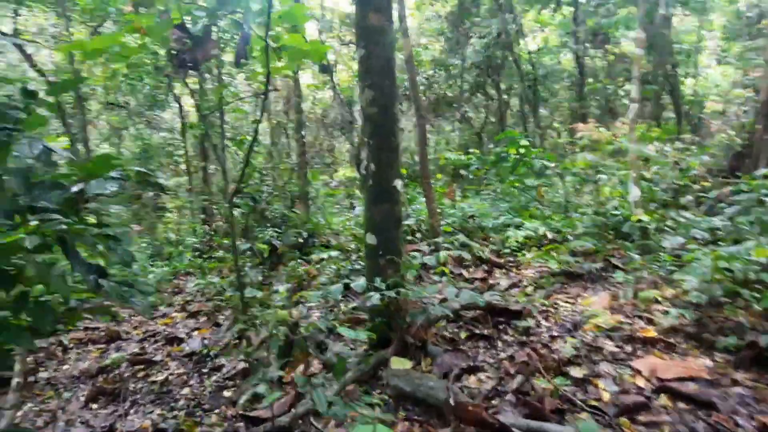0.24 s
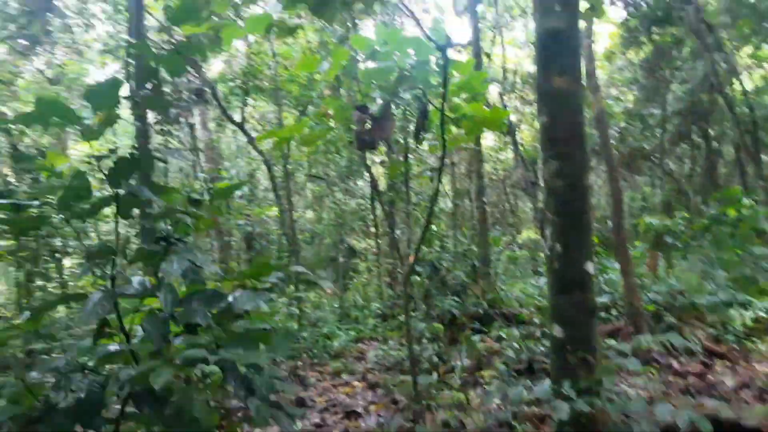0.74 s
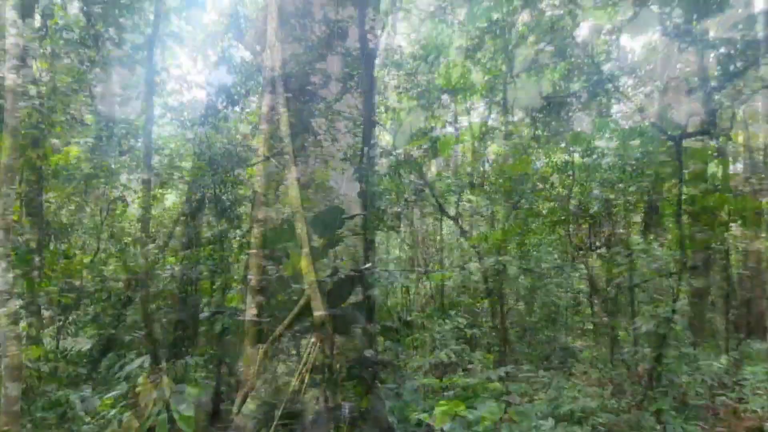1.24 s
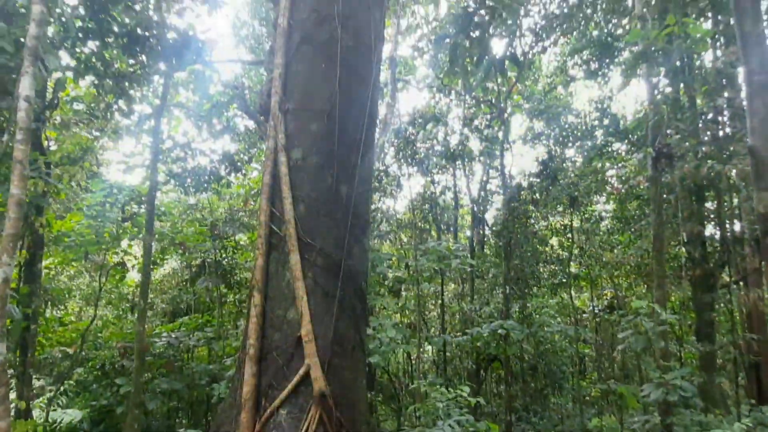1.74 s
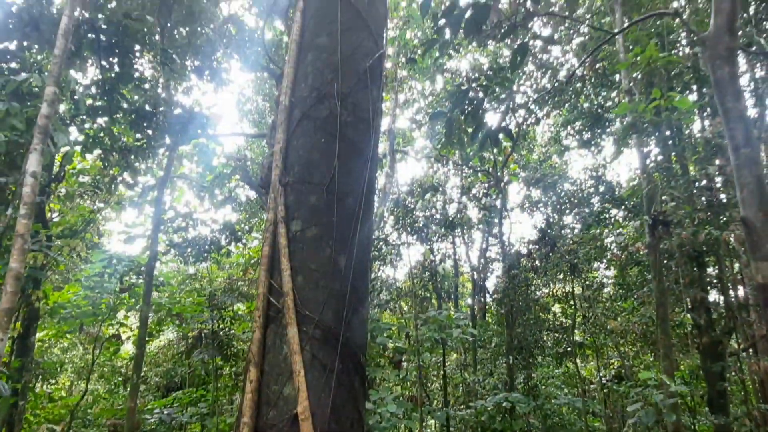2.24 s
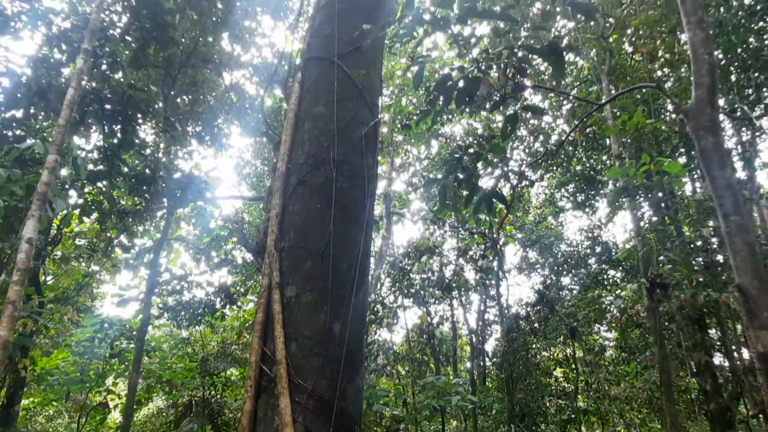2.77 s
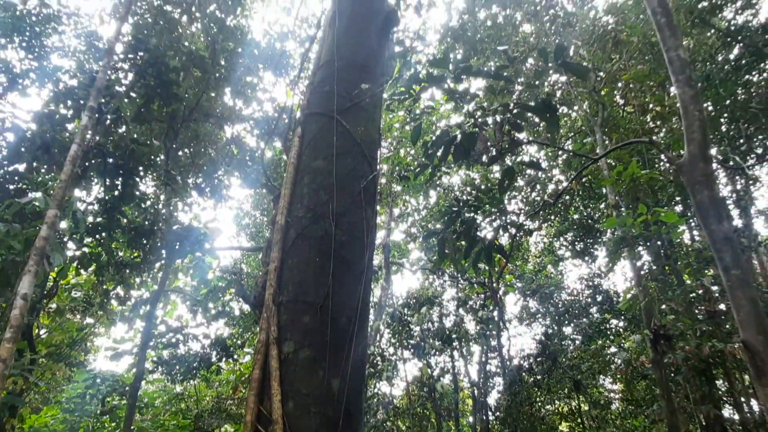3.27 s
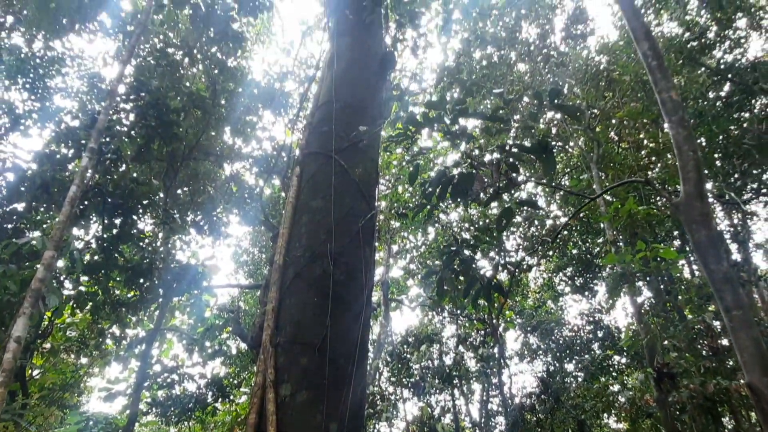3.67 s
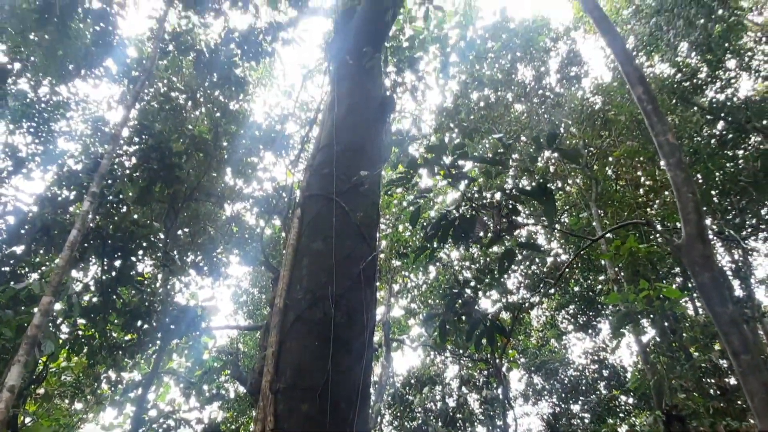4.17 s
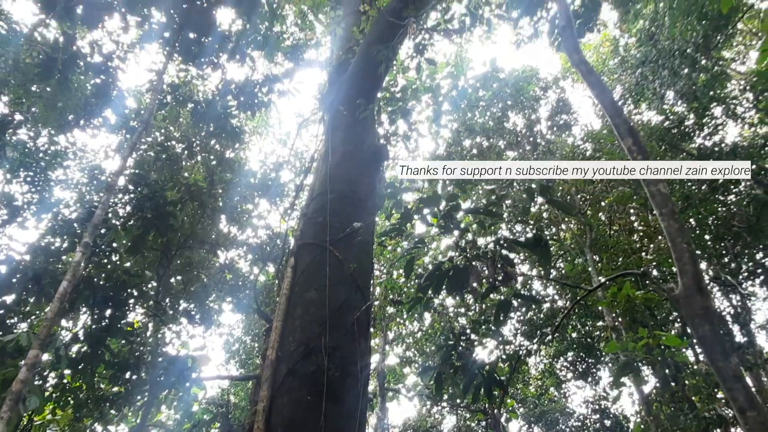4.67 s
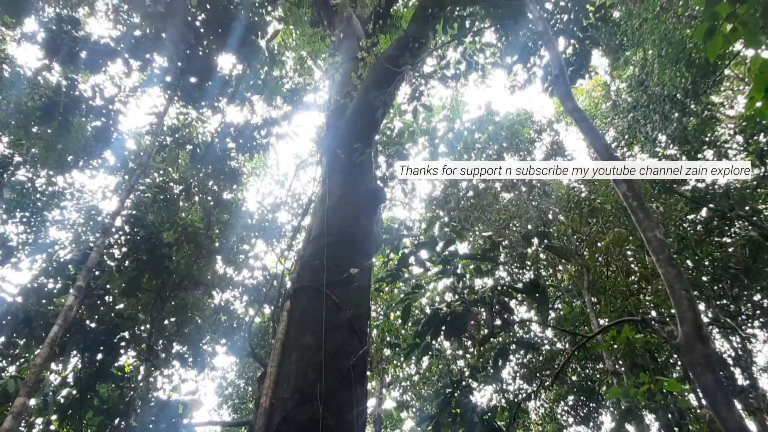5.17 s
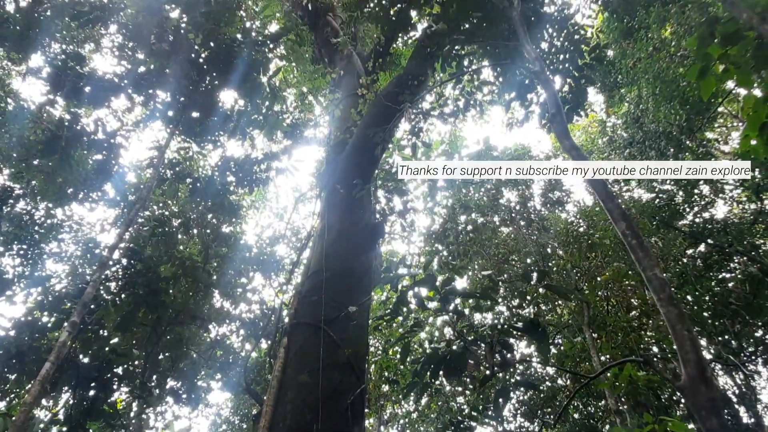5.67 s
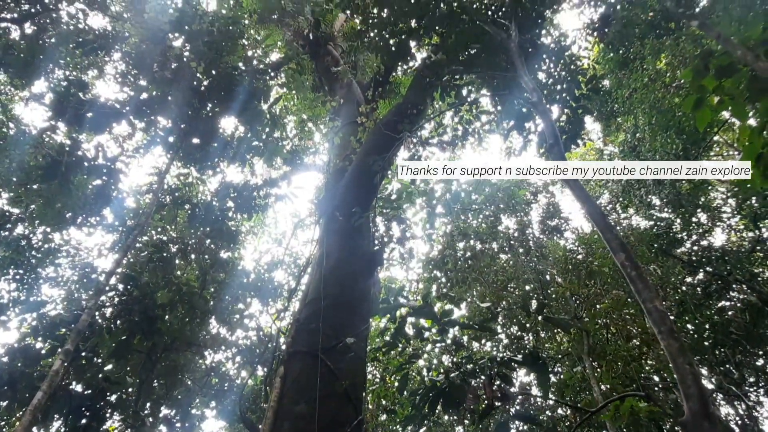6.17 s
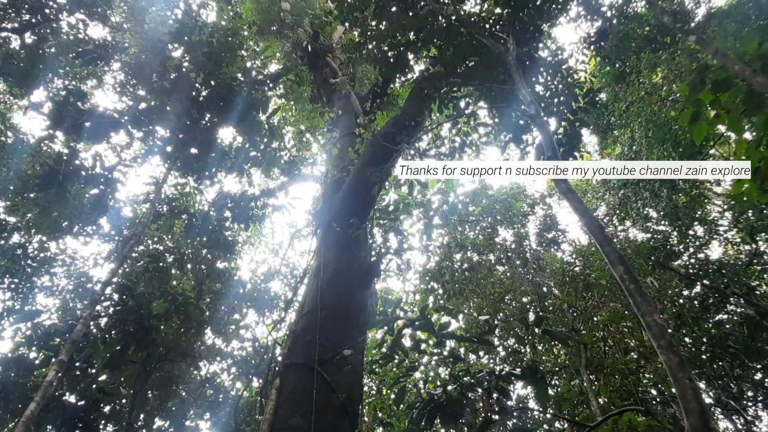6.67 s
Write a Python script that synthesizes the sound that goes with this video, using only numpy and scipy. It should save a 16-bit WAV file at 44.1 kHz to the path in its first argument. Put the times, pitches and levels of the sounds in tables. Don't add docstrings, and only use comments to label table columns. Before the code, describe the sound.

A dense insect chorus fills a tropical forest from 0 to about 6.9 seconds, heard in wide stereo on a handheld microphone. Cicadas hold a shrill, slightly wavering drone near 3 kHz over a blur of distant insect hiss; a fine rasping buzz near 5.8 kHz leans right, and very high katydid hiss near 11 kHz swells about every 0.7 seconds, at first mostly left. From 0 to 0.7 seconds a foot presses dry leaves with twig snaps, the heaviest crunch at 0.5; light crackles end near 1.1. At 0.95-1.2 a gust thumps the left side with low, lumpy thuds, a faint puff reaching the right. The insects duck, then recover by 2.5 as the microphone turns, katydids becoming more centred and the buzz stronger. Afterward the chorus continues with quiet low-air swells, faint leaf stirs and tiny ticks or drips.

```python
import sys
import numpy as np
from scipy import signal
from scipy.fft import rfft, irfft, next_fast_len
from scipy.io import wavfile

SR = 44100
rng = np.random.default_rng(int(sys.argv[2]) if len(sys.argv) > 2 else 0)


def dump_mix(stems):
    frames = np.atleast_2d(stems).T
    limited = np.clip(frames, -1, 1)
    pcm = np.round(limited * 32767).astype(np.int16)
    wavfile.write(sys.argv[1], SR, pcm)


def invert_db(level):
    return 10 ** (np.asarray(level, dtype=float) / 20)


N = 304731
TIME = np.arange(N) / SR
HZ = np.maximum(np.fft.rfftfreq(next_fast_len(N), 1 / SR), 1)

# (frequency [Hz], density [dB per Hz])
FAR_HISS_COLOUR = [(1000, -48), (1280, -28), (1400, -12), (1850, -7.5), (2050, -12), (2350, 1.5), (2700, 5),
                   (3400, 5.5), (4500, 1.5), (6500, 5.5), (7800, 0), (9500, -1), (14000, -5), (15100, -6.5)]
# (frequency [Hz], density [dB per Hz])
RUMBLE_COLOUR = [(15, -53), (25, -22.5), (49, -8), (119, 2), (189, -6), (310, -1.5), (355, 1), (432, -8),
                 (900, -21.5), (1170, -48), (1980, -120)]
# (frequency [Hz], density [dB per Hz])
STIR_COLOUR = [(450, -5), (800, -5), (1250, -1), (1900, -12)]
# (start of the top [s], hold [s], level [dB])
SWELLS = [(2.4, 0.087, -66.5), (2.865, 0.1, -62.0), (3.3, 0.23, -64.5), (3.72, 0.042, -62),
          (4.04, 0.19, -64.5), (4.913, 0.11, -61.5), (5.153, 0.57, -66), (5.997, 0.03, -66),
          (6.3, 0.16, -67.5), (6.748, 0.03, -68.5)]
# (start of the top [s], hold [s], level [dB])
STIRS = [(1.3, 0.16, -72), (1.635, 0.26, -67.5), (2.43, 0.13, -67.5), (2.698, 0.02, -64.0),
         (2.798, 0.01, -70), (2.91, 0.12, -70), (3.167, 0.06, -67), (3.433, 0.037, -68),
         (3.692, 0.076, -63.5), (4.6, 0.02, -69), (4.71, 0.03, -72), (4.89, 0.01, -71), (4.99, 0.02, -67),
         (5.143, 0.02, -66), (5.47, 0.047, -69), (5.72, 0.02, -71.5), (6.75, 0.067, -73.0)]
# (start of the top [s], hold [s], level [dB])
PHRASES = [(0.4, 0.06, -37.0), (0.621, 0.06, -36), (1.3, 0.1, -35.5), (2.048, 0.16, -33.5),
           (2.722, 0.2, -34), (3.551, 0.12, -33.5), (3.8, 0.25, -35.5), (4.351, 0.36, -34.5),
           (5.15, 0.27, -33.5), (5.853, 0.3, -33.5), (6.579, 0.25, -33)]
# (centre [Hz], width [Hz], density [dB per Hz])
SHIMMER_LEFT = [(11240, 1010, 0)]
SHIMMER_RIGHT = [(11740, 790, 1.5), (13300, 1400, -7.5)]
# (centre [Hz], width [Hz], density [dB per Hz])
BUZZ_BODY = [(5770, 42, 0), (5765, 140, -6.5), (5330, 560, -10.5)]
# (time [s], level [dB])
DRONE_EFFORT = [(0.0, -30.5), (0.3, -30.5), (0.8, -32), (1.2, -29.5), (1.6, -28), (2.0, -30.0),
                (2.4, -26.5), (2.85, -31), (3.3, -28), (3.6, -30.5), (3.85, -28), (4.3, -28.0),
                (4.62, -30.5), (5.0, -27.5), (5.4, -30.0), (5.9, -27.5), (6.5, -28.5), (6.91, -32.5)]
# (multiple of the click rate [1], level [dB])
DRONE_PARTIALS = [(4, -23.5), (5, 0.5), (6, -23.5), (7, -21.5)]
# (time [s], peak [dB], pitch [Hz], left over right [dB])
TICKS = [(0.02, -28, 1340, 2), (0.171, -39, 328, 5.5), (0.193, -38, 1170, 6.5), (0.214, -49, 552, 5),
         (0.241, -37, 320, 5), (0.265, -40, 352, 6), (0.365, -20, 450, 6), (0.455, -41, 464, 3.5),
         (0.489, -10.5, 357, 2), (0.552, -22.5, 340, 0), (0.628, -25, 1140, 6), (0.689, -24, 1100, 2),
         (2.696, -47, 1380, 7), (2.789, -40, 1850, 11), (3.168, -41, 1540, 5.0), (3.479, -50, 1630, 2.5),
         (3.691, -45, 734, 6), (3.749, -56, 350, 2.5), (4.888, -43, 1900, 6.0), (4.986, -36, 1840, 2),
         (5.149, -50.5, 1500, 1.0), (5.729, -45, 1670, 6), (0.479, -20.5, 366, 1), (3.7, -49.5, 416, 5)]
# (start [s], hold [s], dull crunch [dB], crisp crackle [dB], low shuffle [dB])
PRESSES = [
    (0.0, 0.0066, -46, -40.5, -53),
    (0.24, 0.013, -46, -48.5, -47.5),
    (0.383, 0.005, -51, -57.0, -47.5),
    (0.497, 0.051, -29.5, -34.5, -52.5),
    (0.606, 0.044, -41, -41, -64.0),
    (0.668, 0.027, -42.5, -37.5, -58.0),
    (0.914, 0.042, -47.5, -52.5, -65),
    (1.086, 0.005, -40, -44.5, -70.0),
    (1.306, 0.005, -71, -66, -76.5),
    (1.355, 0.01, -70, -72, -70),
]
# (frequency [Hz], density [dB per Hz])
CRUNCH_COLOUR = [(150, -42.5), (230, -25.5), (300, -3), (390, -5.5), (550, -3), (750, -9), (1100, -15.5),
                 (1500, -35.5)]
CRACKLE_COLOUR = [(400, -20), (800, 1.5), (1500, 4), (2500, -3), (5000, -6), (10000, -23), (15000, -24.5)]
# (time [s], level [dB])
GUST_LEFT = [
    (0.925, -62),
    (0.948, -24),
    (0.99, -27.5),
    (1.022, -16.5),
    (1.062, -24),
    (1.1, -18),
    (1.19, -32),
    (1.37, -45.5),
    (1.46, -82.5),
]
# (time [s], level [dB])
GUST_RIGHT = [
    (1.07, -75),
    (1.09, -63),
    (1.15, -34),
    (1.2, -54),
    (1.26, -60),
    (1.35, -79),
    (1.4, -49),
    (1.44, -78),
]
# (time [s], peak [dB], pitch [Hz])
EDDIES = [(.95, -12.5, 110.2), (1.004, -12, 120), (1.015, -11.5, 148.2), (1.022, -3.5, 130),
          (1.031, -2, 200), (1.053, -11.5, 200), (1.093, -8, 120), (1.098, -4.5, 150), (1.117, -10.5, 110),
          (1.128, -16.5, 200), (1.02, -12, 76.2)]
# (frequency [Hz], density [dB per Hz])
WIND_COLOUR = [(30, -40), (50, -12), (62, -2), (75, 0), (98, -12), (130, -8), (170, -14), (230, -34)]
WIND_EDGE_COLOUR = [(140, -27), (200, -3), (280, 0), (420, -9.5), (700, -25), (1100, -43.5)]

DUCK_S, DUCK_ATTACK_S, DUCK_HOLD_S, DUCK_RELEASE_S, DUCK_DB = 0.97, 0.22, 0.45, 0.87, -8.5
SHIFT_S, SHIFT_LENGTH_S = 1.1, 0.9
HISS_DB = (-46.5, -47)
PHRASE_GAP_DB, SHIMMER_PAN_DB = (-40.5, -38.5), (9, 1.4)
BUZZ_DB, BUZZ_PAN_DB = (-39.5, -32.5), (-7.5, -5.0)
SWELL_RISE_DB_PER_S, SWELL_FALL_DB_PER_S, CALM_DB, RUMBLE_LEAST_DB = 44.5, 43, -69.5, -73
STIR_RISE_DB_PER_S, STIR_FALL_DB_PER_S, STILL_DB = 300.0, 110.0, -75
PHRASE_RISE_DB_PER_S, PHRASE_FALL_DB_PER_S = 22, 28.5
BUZZ_RATE_HZ, BUZZ_COMB_DB = 72.55, -12
DRONE_RATE_HZ, DRONE_SPREAD_HZ, DRONE_WANDER_HZ, DRONE_PAN_DB = 607.6, 3.6, 5.6, 0.9
PRESS_RISE_DB_PER_S, PRESS_FALL_DB_PER_S, SHUFFLE_FALL_DB_PER_S = 328.5, 219.5, 170.0
RUSTLE_DB, RUSTLE_END_S, RUSTLE_FALL_DB_PER_S = (-52.5, -52.5, -65), 1.1, 68.5
HARD_GUST_DB, EDGE_PER_DB, EDGE_LEAST_DB = -16, 1.5, -19


def rms_one(x):
    return x / np.sqrt(np.mean(x ** 2, axis=-1, keepdims=True) + 1e-20)


def in_time(rows):
    times, levels_db = np.transpose(rows)
    return np.interp(TIME, times, levels_db, left=-150, right=-150)


def panned(x, pan_db):
    return x * invert_db(np.array([[0.5], [-0.5]]) * pan_db)


def drift(rate, count, at=TIME):
    knots = rng.standard_normal((count, int(N / SR * 40) + 200))
    r = np.exp(-2 * np.pi * rate / 40)
    smooth = signal.lfilter([1], [1, -2 * r, r * r], knots)
    slow = rms_one(smooth[:, 150:])
    return np.array([np.interp(at * 40, np.arange(slow.shape[1]), row) for row in slow])


def sloped(points):
    hz, level_db = np.transpose(points)
    return invert_db(np.interp(np.log(HZ), np.log(hz), level_db, left=-90, right=-90))


def humps(bells):
    power = 0
    for hz, width, level_db in bells:
        power = power + invert_db(2 * level_db) * np.exp(-0.5 * ((HZ - hz) / width) ** 2)
    return np.sqrt(power)


def coloured(x, gain):
    size = next_fast_len(N)
    return rms_one(irfft(rfft(x, size) * gain, size)[..., :N])


def pair(alike):
    mid, side = rng.standard_normal((2, N))
    return np.sqrt(1 + alike) * mid + np.sqrt(1 - alike) * side * [[1], [-1]]


def peaks(starts, holds, levels_db, rise, fall):
    curves = []
    for start, hold, level_db in zip(starts, holds, levels_db):
        below_db = np.maximum(rise * (start - TIME), fall * (TIME - start - hold))
        curves.append(level_db - np.maximum(below_db, 0))
    return np.max(curves, axis=0)


def ducked():
    corners = np.cumsum([DUCK_S, DUCK_ATTACK_S, DUCK_HOLD_S, DUCK_RELEASE_S])
    return np.interp(TIME, corners, [0, DUCK_DB, DUCK_DB, 0])


def shifted(ends):
    return np.interp(TIME, [SHIFT_S, SHIFT_S + SHIFT_LENGTH_S], ends)


def pressure():
    starts, holds, *layers = np.transpose(PRESSES)
    falls = PRESS_FALL_DB_PER_S, PRESS_FALL_DB_PER_S, SHUFFLE_FALL_DB_PER_S
    settling = RUSTLE_FALL_DB_PER_S * np.maximum(TIME - RUSTLE_END_S, 0)
    return [np.maximum(peaks(starts, holds, levels_db, PRESS_RISE_DB_PER_S, fall), bed_db - settling)
            for levels_db, fall, bed_db in zip(layers, falls, RUSTLE_DB)]


def far_insects():
    return invert_db(shifted(HISS_DB) + ducked() + 12.0) * coloured(pair(0.044), sloped(FAR_HISS_COLOUR))


def low_air():
    swell_db = peaks(*np.transpose(SWELLS), SWELL_RISE_DB_PER_S, SWELL_FALL_DB_PER_S)
    air_db = np.maximum(swell_db, CALM_DB + ducked())
    shuffle_db = pressure()[2] + 1.5
    level_db = np.maximum(np.maximum(air_db, shuffle_db), RUMBLE_LEAST_DB)
    unrest_db = 1.8 * drift(6.9, count=1)
    return panned(invert_db(level_db + unrest_db) * coloured(pair(0.72), sloped(RUMBLE_COLOUR)), 1.5)


def stirring_leaves():
    stir_db = peaks(*np.transpose(STIRS), STIR_RISE_DB_PER_S, STIR_FALL_DB_PER_S)
    level_db = np.maximum(stir_db, STILL_DB) - 0.6 + 1.5 * drift(5.3, count=1)
    return panned(invert_db(level_db) * coloured(pair(0.27), sloped(STIR_COLOUR)), 1.5)


def katydids():
    phrase_db = peaks(*np.transpose(PHRASES), PHRASE_RISE_DB_PER_S, PHRASE_FALL_DB_PER_S)
    level_db = np.maximum(phrase_db, shifted(PHRASE_GAP_DB)) + ducked()
    song = coloured(pair(0), np.array([humps(SHIMMER_LEFT), humps(SHIMMER_RIGHT)]))
    unrest_db = 0.52 * drift(7.0, count=1)
    return panned(invert_db(level_db - 0.7 + unrest_db) * song, shifted(SHIMMER_PAN_DB))


def buzzer():
    turns = np.cumsum(BUZZ_RATE_HZ + 0.055 * drift(0.5, count=1)[0]) / SR
    multiples = np.arange(69, 82)
    heights = invert_db(3.0 * rng.standard_normal((13, 2, 1)))
    starts = rng.random((13, 2, 1))
    comb = 0
    for multiple, height, start in zip(multiples, heights, starts):
        comb = comb + height * np.sin(2 * np.pi * (multiple * turns + start))
    song = coloured(pair(0), humps(BUZZ_BODY)) + invert_db(BUZZ_COMB_DB) * rms_one(comb)
    level_db = shifted(BUZZ_DB) + ducked() - 1.06 + 0.5 * drift(2.4, count=1)
    return panned(invert_db(level_db) * song, 1.39 * shifted(BUZZ_PAN_DB))


def cicadas(count=11):
    singers = 2 * count
    coarse = TIME[::32]
    places = np.sqrt(3) * np.tile(np.linspace(-1, 1, count), 2)[:, None]
    offset_hz = DRONE_SPREAD_HZ * places + DRONE_WANDER_HZ * drift(4.0, count=singers, at=coarse)
    lead = 2 * np.pi * (np.cumsum(offset_hz, axis=1) * coarse[1] + rng.random((singers, 1)))
    strength = invert_db(0.95 * drift(1.1, count=singers, at=coarse))
    ears = 0
    for multiple, partial_db in DRONE_PARTIALS:
        singing = strength * np.exp(1j * multiple * lead)
        beats = singing.reshape(2, count, -1).sum(axis=1)
        carrier = np.exp(2j * np.pi * multiple * DRONE_RATE_HZ * TIME)
        ears = ears + invert_db(partial_db) * np.real([np.interp(TIME, coarse, beat) * carrier for beat in beats])
    level_db = in_time(DRONE_EFFORT) + ducked() + 3.5
    return panned(invert_db(level_db) * rms_one(ears), DRONE_PAN_DB)


def ticks():
    out, t = np.zeros((2, N)), TIME[:2000]
    for s, peak_db, hz, pan_db in TICKS:
        band = signal.butter(2, [hz * 0.58, hz * 1.2], "band", fs=SR, output="sos")
        puff = rms_one(signal.sosfilt(band, rng.standard_normal(2000)))
        ring = np.sin(2 * np.pi * hz * t) * np.exp(-t * hz / 1.5)
        sound = 1.35 * ring + 0.26 * puff * np.exp(-t / 0.0088)
        onset = 1 - np.exp(-t * hz / 0.5)
        at = round(s * SR)
        out[:, at:at + 2000] += panned(invert_db(peak_db + 0.5) * sound * onset, np.clip(pan_db, -6, 6))
    return signal.sosfilt(signal.butter(3, 240, "high", fs=SR, output="sos"), out)


def litter():
    sizes = invert_db(2.9 * np.minimum(rng.exponential(1, N), 5))
    grains = sizes * (rng.random(N) < 4000 / SR)
    dull_db, crisp_db, _ = pressure()
    dull = invert_db(dull_db) * coloured(pair(0.9) * (grains + 0.096), sloped(CRUNCH_COLOUR))
    crisp = invert_db(crisp_db + 2.0) * coloured(pair(0.4) * (grains + 0.07), sloped(CRACKLE_COLOUR))
    return panned(dull + crisp, 3.5)


def gust():
    level_db = in_time(GUST_LEFT)
    edge_db = np.clip(EDGE_PER_DB * (level_db - HARD_GUST_DB), EDGE_LEAST_DB, 0)
    bass = coloured(pair(0), sloped(WIND_COLOUR))
    edge = coloured(pair(0), sloped(WIND_EDGE_COLOUR))
    left = invert_db(level_db + 5.0) * bass[0] + invert_db(level_db + edge_db + 5.5) * edge[0]
    for k, (s, peak_db, hz) in enumerate(EDDIES):
        turns = (TIME - s) * hz
        thud = np.cos(2 * np.pi * turns) * np.exp(-(turns / 0.4) ** 2)
        left += (-1) ** k * invert_db(peak_db) * thud
    right = invert_db(in_time(GUST_RIGHT)) * (bass[1] + 0.28 * edge[1])
    return signal.sosfilt(signal.butter(3, 45, "high", fs=SR, output="sos"), [left, right])


def scene():
    background = far_insects() + low_air() + stirring_leaves()
    insects = katydids() + buzzer() + cicadas()
    return background + insects + ticks() + litter() + gust()


def top_cut(x):
    return signal.sosfilt(signal.butter(12, 15500, fs=SR, output="sos"), x)


def record(dry):
    mix = 1.6 * np.tanh(dry / 1.6)
    return top_cut(mix)


dry = scene()
out = record(dry)
dump_mix(out)
```